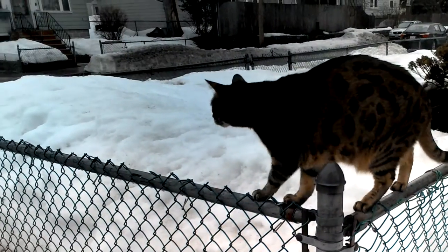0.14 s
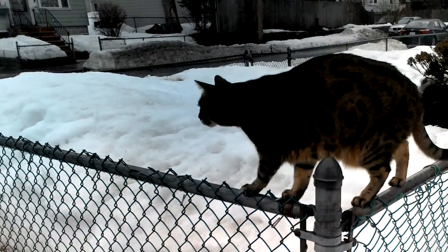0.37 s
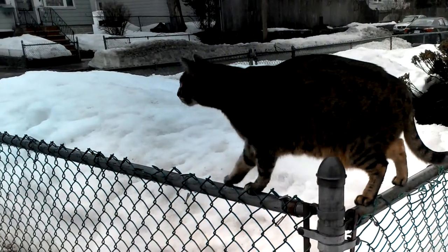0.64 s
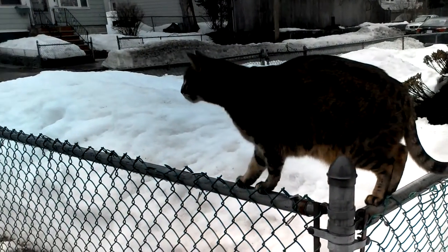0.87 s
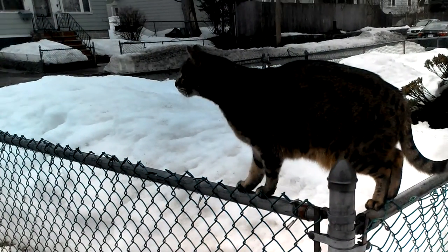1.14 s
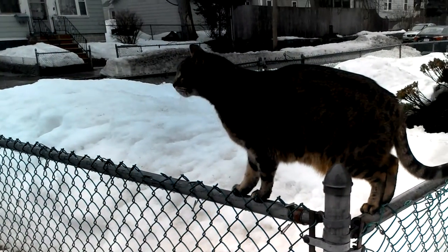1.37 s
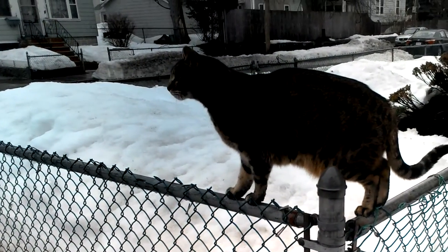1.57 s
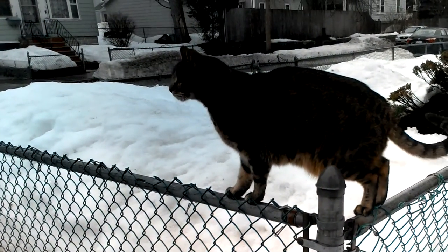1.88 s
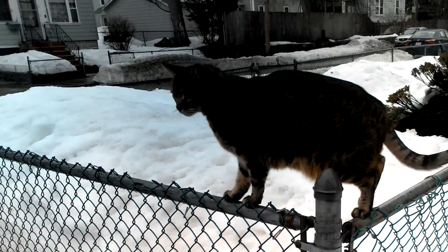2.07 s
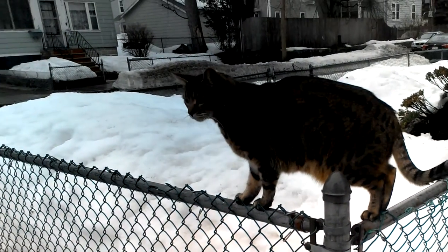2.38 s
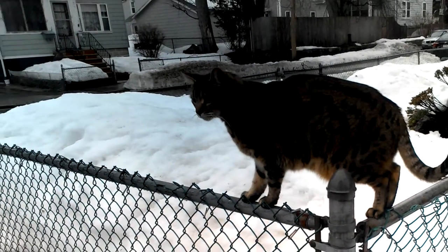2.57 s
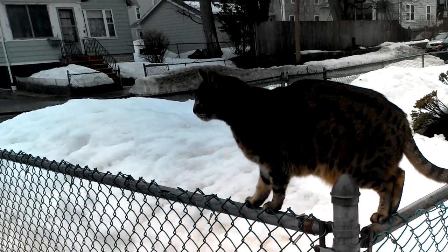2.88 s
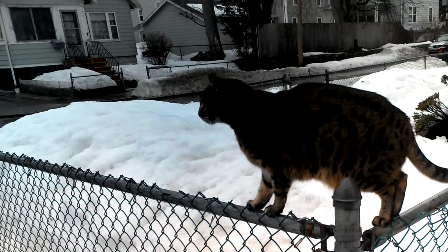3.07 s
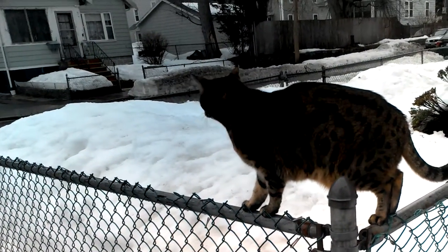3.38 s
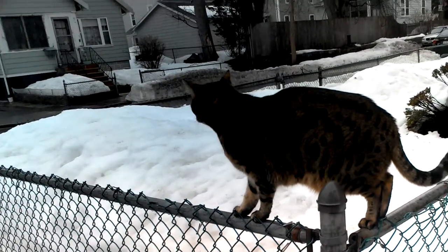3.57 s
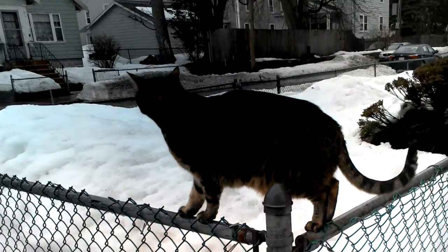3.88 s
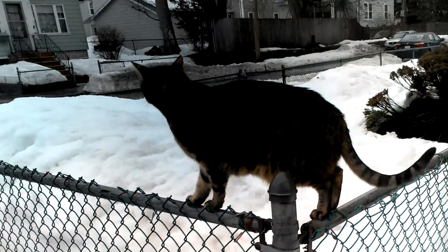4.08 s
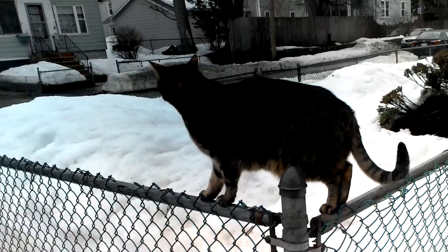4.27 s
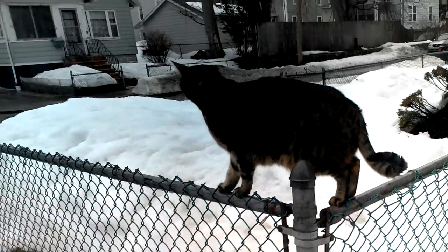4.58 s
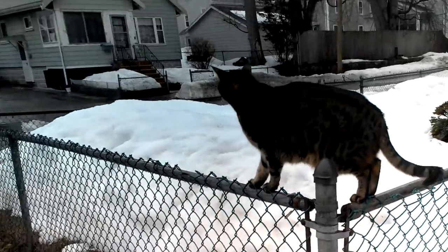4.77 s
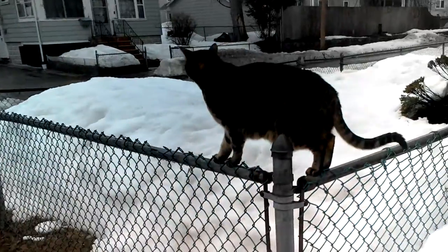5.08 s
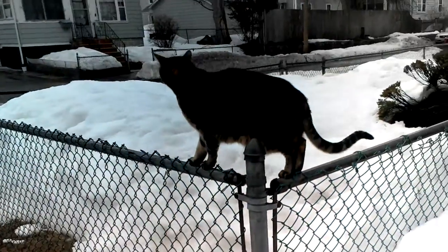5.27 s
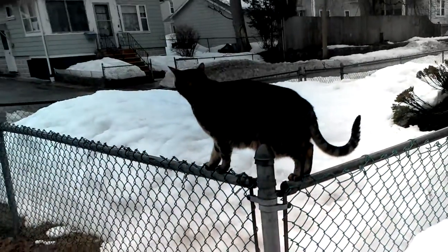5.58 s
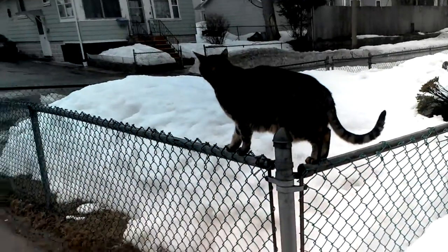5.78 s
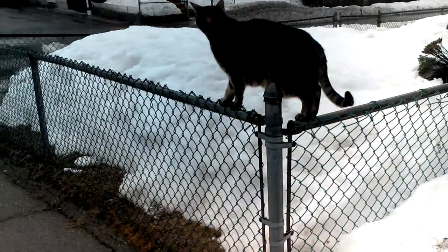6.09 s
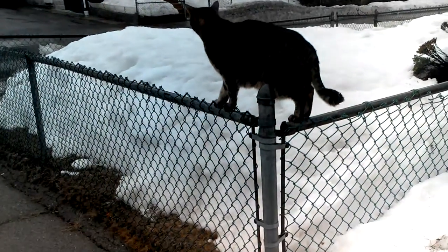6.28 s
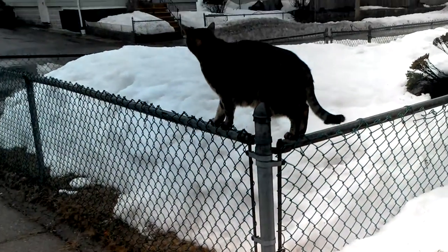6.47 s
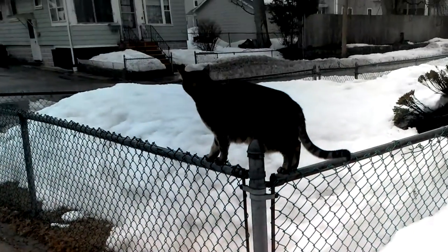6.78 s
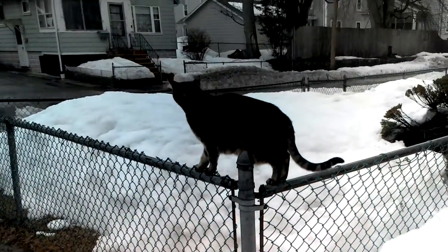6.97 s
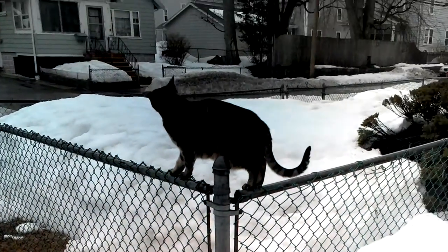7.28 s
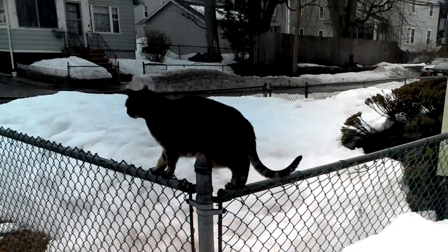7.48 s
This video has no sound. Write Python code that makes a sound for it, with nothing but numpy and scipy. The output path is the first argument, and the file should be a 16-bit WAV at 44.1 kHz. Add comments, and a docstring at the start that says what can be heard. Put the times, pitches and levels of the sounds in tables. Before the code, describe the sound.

Sharp, dense crackling taps close to a small microphone, opening with a rustling rush, over soft steady noise and faint rumble outdoors.

```python
"""Sharp crackling taps close to a small microphone, as of handling or stiff material crunching.
Each tap is a crack, a short ring and a low thump, made of fading sines and noise.
Fine crackle swells briefly around each strong tap, and a patter of light taps falls between them.
At first there is a rustling rush: dense noise and clicks, sent through resonances.
Soft steady background noise and a low rumble, both made of filtered noise, lie below."""
import sys
import numpy as np
from scipy import signal
from scipy.fft import rfft, irfft
from scipy.io import wavfile

SR = 44100
rng = np.random.default_rng(int(sys.argv[2]) if len(sys.argv) > 2 else 0)


def file_out(sig):
    """Save sig as 16-bit WAV at sys.argv[1]."""
    # one column per channel
    cols = np.atleast_2d(sig).T
    # limit, then scale
    lim = np.clip(cols, -1, 1)
    pcm = np.round(lim * 32767).astype(np.int16)
    wavfile.write(sys.argv[1], SR, pcm)


N = 336924

# strong taps: start_s [s], ring_pitch_hz [Hz], ring_db [dB],
# crack_pitch_hz [Hz], crack_db [dB], thump_db [dB]
STRONG_TAPS = [(0.04, 600, -7, 6800, -18, -41), (0.0621, 810, -13, 5740, -26, -36),
               (0.16, 900, -31, 7500, -8, -34), (0.171, 860, -18, 7050, -14, -34),
               (0.1853, 2140, -24, 7270, -6, -40), (0.2274, 480, -9.5, 3740, -12, -16),
               (0.2036, 900, -31, 9000, -7, -36), (0.282, 980, -40, 4500, -17, -39),
               (0.3862, 800, -11.5, 4640, -17, -26), (0.4901, 870, -37, 7240, -14.5, -43),
               (0.533, 910, -17.5, 3200, -22, -32), (0.614, 563, -15.5, 3500, -26, -32),
               (0.823, 500, -18, 6220, -14.5, -21), (0.8411, 720, -17, 5500, -16, -45),
               (1.167, 1240, -23.5, 4380, -19, -41), (1.1857, 1100, -12.5, 3270, -25, -18.5),
               (1.2342, 1190, -23.5, 4370, -25, -27), (1.3815, 457, -7, 3150, -11, -43),
               (1.3988, 470, -13, 3050, -24, -45), (1.4666, 640, -15.5, 3430, -52, -47),
               (1.5422, 480, -22, 3120, -52, -43), (1.6107, 566, -29, 3160, -42, -39),
               (1.7234, 1310, -29, 6020, -23, -43), (1.7382, 2000, -33, 5360, -22, -57),
               (1.821, 1110, -25, 8200, -13.5, -48), (1.8406, 1200, -21, 3240, -29, -50),
               (1.863, 1100, -21.0, 4600, -37, -42), (1.889, 1160, -23, 4760, -39, -50),
               (1.9096, 880, -26, 4550, -34, -34), (1.975, 1200, -27.5, 3770, -32, -48.5),
               (1.9864, 1140, -25, 6540, -30, -55), (1.9958, 1080, -36, 5140, -29, -55),
               (2.0055, 1190, -22.5, 5800, -20, -49), (2.014, 1090, -23, 4770, -23, -53),
               (2.0382, 640, -25, 6370, -21, -40), (2.098, 1340, -28.5, 7270, -41, -56),
               (2.1627, 1150, -29.5, 5200, -27, -55), (2.1783, 1290, -27, 5220, -31, -50),
               (2.183, 1210, -26.5, 3150, -52, -49.5), (2.3, 700, -22, 4240, -41, -46),
               (2.3306, 1100, -19, 5350, -38, -23), (2.3351, 810, -14, 5400, -15, -33.5),
               (2.3364, 1090, -24, 7700, -19, -26.5), (2.3435, 1290, -37, 4390, -35, -41),
               (2.405, 1170, -26, 3540, -39, -55), (2.4691, 570, -20.5, 3100, -46, -61),
               (2.478, 1120, -23.5, 3280, -41, -60), (2.5927, 1100, -30, 7900, -21.5, -57),
               (2.626, 1020, -23.5, 4260, -25, -58), (2.65, 1810, -15, 4000, -11.5, -21.5),
               (2.703, 1070, -19, 3780, -24, -56), (2.716, 1130, -27, 4380, -40, -54),
               (2.7202, 1690, -27.5, 3900, -32, -47), (2.7314, 480, -24, 6850, -26, -42),
               (2.738, 2170, -21, 6230, -18, -30), (2.8526, 1210, -26.5, 7100, -21.5, -38),
               (2.997, 1380, -28, 5670, -18.5, -53), (3.0494, 2820, -29, 5630, -25, -57),
               (3.064, 2780, -29.5, 6650, -24, -58), (3.1023, 1320, -28, 7340, -30, -54),
               (3.1078, 2220, -29, 7400, -23, -50), (3.1164, 915, -30, 7050, -17.5, -52),
               (3.14, 1060, -30, 7600, -21, -51), (3.172, 1350, -31, 4700, -24, -34),
               (3.2098, 1240, -34.5, 4220, -25, -53), (3.23, 685, -29, 3660, -37, -44),
               (3.3106, 990, -34, 8400, -31, -55.5), (3.3406, 1260, -33.5, 3680, -39, -57.5),
               (3.369, 1730, -33, 4380, -45, -57), (3.3928, 855, -31, 4220, -34, -52),
               (3.4466, 970, -14.5, 6820, -11, -37), (3.462, 2150, -26, 6260, -22, -32),
               (3.4708, 1000, -14, 4020, -9.5, -31), (3.5059, 1240, -19, 5800, -5, -48),
               (3.5079, 3080, -18.5, 5960, -4.5, -50), (3.5274, 1200, -51, 3940, -21, -49),
               (3.5468, 1100, -22, 5300, -13, -46.0), (3.554, 860, -34, 4260, -26, -46.5),
               (3.6098, 1130, -28, 3000, -23, -57), (3.6648, 1400, -31, 3400, -25, -70),
               (3.7834, 1100, -33, 5510, -31, -61.0), (3.7874, 1130, -37, 3970, -24.5, -57),
               (3.8128, 1310, -34.5, 6100, -28, -56), (3.851, 845, -34, 3930, -41, -60),
               (3.8925, 1100, -40, 7700, -33, -60), (3.9001, 1100, -32.5, 5800, -32, -55),
               (3.9285, 1290, -40, 7000, -33, -60), (3.959, 2300, -40, 6500, -42, -62),
               (3.9828, 2390, -22, 4020, -49, -64), (4.001, 1150, -28, 7260, -24, -45),
               (4.0283, 1230, -27, 3850, -17.5, -57), (4.0476, 450, -18.5, 6900, -17, -49),
               (4.064, 810, -28, 6310, -32, -57), (4.1101, 1100, -30.5, 5950, -24, -54),
               (4.1773, 585, -33, 3120, -33, -51), (4.244, 480, -27, 6920, -49, -51),
               (4.265, 800, -19, 3270, -20, -43), (4.283, 575, -12.5, 3180, -16, -32),
               (4.3202, 1100, -22.5, 7530, -19, -29), (4.3238, 920, -18, 3130, -25, -39),
               (4.442, 1070, -25.5, 8400, -25, -45), (4.5184, 1060, -27, 6190, -30.5, -40),
               (4.5217, 1060, -19, 6320, -9, -48), (4.537, 584, -16, 8100, -15, -42),
               (4.543, 1040, -22, 4530, -31, -39), (4.5997, 1030, -15, 4300, -21, -36),
               (4.6025, 593, -22, 4130, -33, -34), (4.6078, 706, -20, 4200, -22, -49),
               (4.6163, 1090, -25, 8300, -21, -46.5), (4.649, 1120, -28, 7600, -19, -56),
               (4.654, 990, -26, 5200, -18.5, -41), (4.739, 1070, -30, 5300, -23, -55),
               (4.783, 2220, -29.5, 4400, -42, -53), (4.823, 1100, -19.5, 5000, -25, -56),
               (4.8304, 686, -13, 9500, -12, -35.5), (4.84, 970, -26, 7900, -31, -31),
               (4.8477, 870, -20.5, 7780, -33, -51), (4.8495, 480, -28.0, 7720, -25, -27),
               (4.8891, 2030, -21, 3100, -40, -33), (4.8983, 710, -29, 8000, -26, -38),
               (4.9018, 980, -19.5, 7650, -28, -35), (4.9067, 860, -21, 7900, -32, -52),
               (4.951, 1040, -35, 3600, -29, -41), (4.9603, 935, -24, 3530, -22, -48),
               (5.0159, 1150, -24, 3500, -27.5, -51), (5.0202, 1040, -24, 3550, -29, -50),
               (5.058, 690, -11.5, 3900, -14, -24), (5.0636, 715, -21, 3780, -36, -47),
               (5.0704, 690, -19.5, 3320, -22, -36), (5.0755, 1120, -10, 3300, -8.5, -25),
               (5.0778, 620, -19, 7000, -16.5, -35), (5.0988, 660, -29, 8550, -33, -49),
               (5.1188, 670, -26, 3930, -27.5, -41), (5.1212, 680, -21, 3400, -36, -39),
               (5.1486, 1060, -20, 4370, -30, -38), (5.1656, 950, -24.5, 3410, -28, -49),
               (5.1723, 1840, -20, 3530, -42, -42), (5.1985, 890, -23.5, 6700, -36, -54),
               (5.2135, 980, -27, 3360, -26, -47), (5.2359, 1940, -23.5, 5100, -29, -47.0),
               (5.2405, 1100, -26.5, 4910, -26, -44), (5.2692, 1060, -19.5, 7200, -17, -39),
               (5.2771, 1070, -22, 7500, -27, -44), (5.3079, 2230, -28, 7160, -24, -55),
               (5.3881, 690, -25, 4070, -26, -40), (5.4102, 620, -21.5, 5000, -26, -39),
               (5.426, 570, -20.5, 4830, -30, -39), (5.444, 1370, -25, 6100, -32, -47),
               (5.45, 1660, -29, 3270, -38, -56.0), (5.464, 1670, -25, 7900, -19.5, -35),
               (5.478, 1720, -29, 3320, -30, -48.5), (5.503, 1110, -16.5, 2770, -11, -30),
               (5.508, 1730, -34, 3420, -31, -49), (5.513, 1060, -28, 3500, -33, -44),
               (5.535, 760, -19.5, 4070, -36, -34), (5.6135, 1040, -19.5, 7640, -26, -40),
               (5.6197, 740, -21, 2960, -19, -35), (5.6256, 1020, -27, 3030, -21, -47),
               (5.6513, 634, -17.5, 3340, -37, -29.5), (5.6565, 980, -20, 4060, -20, -32),
               (5.668, 1430, -24, 6530, -18.5, -53), (5.6717, 1730, -25, 6800, -29, -53),
               (5.693, 546, -25, 7900, -28, -33), (5.6965, 710, -25, 7070, -31, -43),
               (5.7334, 1130, -23, 4130, -45, -42), (5.738, 760, -28.5, 3530, -45, -51.0),
               (5.745, 1900, -33, 6420, -44, -50.5), (5.761, 1390, -37, 3190, -46, -57.0),
               (5.7753, 1910, -26, 4910, -33, -48.5), (5.7899, 800, -25.5, 4870, -31, -47),
               (5.7932, 730, -33, 7550, -26, -53), (5.847, 2520, -27, 6300, -33, -60),
               (5.8547, 825, -28.5, 3380, -27, -52), (5.8622, 2580, -43, 3420, -31, -56),
               (5.9058, 2600, -40, 3180, -38, -63.5), (5.9826, 1000, -31, 3000, -26, -52),
               (6.036, 1000, -27, 4650, -31, -51), (6.0706, 1770, -21.5, 6250, -18, -51),
               (6.0948, 650, -23.5, 6500, -18.5, -40), (6.1194, 980, -20.5, 7000, -18, -38),
               (6.124, 940, -30, 6100, -18, -51), (6.1365, 755, -22, 5900, -12.5, -41),
               (6.153, 1320, -20, 4000, -21, -47), (6.158, 1010, -16.5, 6200, -15, -36),
               (6.1661, 2170, -23.5, 7000, -20, -37), (6.1737, 1750, -19, 7700, -17, -50),
               (6.1934, 900, -31, 3770, -36, -44), (6.21, 1670, -35, 6140, -16, -53.5),
               (6.2332, 1390, -40, 6000, -26, -54.5), (6.32, 1020, -30, 7950, -29, -41),
               (6.3445, 890, -33, 4570, -21, -44), (6.3633, 1510, -36, 3900, -21, -46),
               (6.4378, 1430, -29, 3880, -29, -52), (6.5594, 630, -19.5, 3100, -33, -36),
               (6.5641, 1740, -25, 3180, -38, -43), (6.573, 1640, -22.5, 5900, -40, -34),
               (6.5765, 1750, -30, 5650, -31, -28), (6.5791, 840, -24, 7000, -28, -25),
               (6.627, 2200, -19, 6760, -24, -30), (6.645, 970, -19, 6260, -16.5, -46),
               (6.6537, 1210, -20, 3080, -32, -42), (6.6796, 513, -19, 3320, -41, -40.5),
               (6.6943, 530, -26, 3200, -43, -50), (6.6978, 1870, -27, 8090, -29, -49),
               (6.825, 970, -25, 5100, -21, -53), (6.8608, 980, -22.5, 3170, -22, -57),
               (6.8933, 1150, -20, 3970, -37, -52), (6.9084, 1710, -21, 3100, -38, -51),
               (6.937, 1670, -21, 3120, -38, -44), (6.9565, 1160, -25, 3610, -31, -52),
               (6.96, 940, -32, 3120, -21, -47), (6.98, 1050, -12, 5300, -20, -28),
               (7.006, 990, -18, 3230, -38, -36), (7.0082, 560, -22, 3230, -33.5, -36),
               (7.0109, 920, -24, 3100, -34, -44.5), (7.0164, 590, -39, 3870, -42, -50),
               (7.06, 1460, -26.5, 8290, -22, -49), (7.084, 1720, -17, 4770, -10.5, -49.0),
               (7.1397, 1750, -25.5, 3330, -32, -55), (7.182, 2640, -23, 3150, -19, -33),
               (7.205, 1500, -33, 7000, -38, -50), (7.2275, 1200, -35, 4000, -35, -52),
               (7.2396, 1290, -19.5, 6660, -9.5, -49), (7.263, 2634, -20, 6600, -22.5, -52),
               (7.283, 2030, -15.5, 4770, -18.5, -55), (7.339, 965, -36, 3540, -35, -59.0),
               (7.3788, 1330, -21, 5220, -44, -57.0), (7.386, 2650, -26, 3100, -32, -53),
               (7.3884, 2580, -18.5, 3060, -26, -39), (7.4137, 1530, -27, 3640, -32, -48.0),
               (7.421, 1920, -29, 3350, -30, -52.5), (7.446, 2200, -17, 3490, -38, -53),
               (7.476, 850, -21, 3520, -21, -32.5), (7.4826, 890, -20.5, 3200, -22, -31),
               (7.4975, 1930, -18, 3560, -16.5, -41), (7.5446, 895, -29, 4030, -39, -45.5),
               (7.5555, 1040, -19.5, 3400, -33, -47.0), (7.5621, 850, -10.5, 4700, -9, -35),
               (7.5697, 970, -23, 5750, -13, -55), (7.5926, 980, -14.5, 5500, -27, -41),
               (7.607, 1300, -24.5, 3240, -35, -47)]


def amp(db):
    """Turn decibels into a factor for the sound wave."""
    return 10 ** (np.asarray(db) / 20)


def rms_one(x):
    """Scale a sound to an average strength (RMS) of 1."""
    return x / np.sqrt(np.mean(x ** 2) + 1e-20)


def in_time(rows, silent_db=-90):
    """Draw lines between a table's levels, one value per sample; outside its times all is near silent."""
    s, *columns = np.transpose(rows)
    t = np.arange(N) / SR
    return [np.interp(t, s, column, silent_db, silent_db) for column in columns]


def drift(rate_per_s, step=16):
    """Smooth random wandering with a spread of 1, drawn at every 16th sample."""
    r = np.exp(-2 * np.pi * rate_per_s * step / SR)
    noise = rng.standard_normal(N // step + 3000)
    slow = signal.lfilter([1], [1, -2 * r, r * r], noise)[2998:]   # skip the filter's start
    return np.interp(np.arange(N) / step, np.arange(len(slow)), rms_one(slow))


def resonance(x, hz, width_hz):
    """Let one band of pitches ring, as a springy body does; the gain at its peak is 1."""
    r = np.exp(-np.pi * width_hz / SR)
    feed = np.array([1, 0, -1]) * (1 - r * r) / 2
    return signal.lfilter(feed, [1, -2 * r * np.cos(2 * np.pi * hz / SR), r * r], x)


def filtered(x, order, hz, kind):
    """Keep only the pitches above a limit ("high"), below it ("low") or between two ("band")."""
    return signal.sosfilt(signal.butter(order, hz, kind, fs=SR, output="sos"), x)


def background():
    """Soft steady noise of many pitches, with low bands of noise that swell and fade as a rumble."""
    # colour of the steady noise: pitch_hz [Hz], density_db [dB per Hz, relative]
    noise_colour = [(80, -33), (130, 4.5), (300, 7), (900, 4), (2500, 1.5), (6000, -5.5), (16000, -6)]
    # low rumble: start_s [s], level_db [dB]
    rumble_levels = [(0.05, -48), (0.34, -83), (1.2, -58), (1.7, -68.5), (3.7, -74), (5.0, -68.5),
                     (5.26, -70), (6.4, -69), (7.64, -62)]
    steady_db = -56
    hz, db = np.transpose(noise_colour)
    f = np.arange(N // 2 + 1) * SR / N + 1   # 1 Hz is added to avoid log(0)
    colour = amp(np.interp(np.log(f), np.log(hz), db))
    steady = irfft(rfft(rng.standard_normal(N)) * colour, N)
    steady_gain = amp(steady_db + drift(1) + 0.96 * drift(20))

    white = rng.standard_normal(N)
    rumble = resonance(resonance(white, 57, 61), 150, 110)
    rumble += amp(-4.0) * resonance(white, 38, 91)
    rumble += amp(-3.0) * resonance(white, 70, 8.9)
    rumble_gain = amp(in_time(rumble_levels)[0])
    return steady_gain * rms_one(steady) + rumble_gain * rms_one(rumble)


def rush():
    """A rustling rush: dense noise with sharp clicks excites broad low and high resonances."""
    # strength of the rush: start_s [s], hiss_db [dB]
    rush_levels = [(0.0, -41), (0.2, -33), (0.43, -41), (0.49, -32.5), (0.56, -34.5), (0.66, -33),
                   (0.74, -39.5), (0.97, -43), (1.06, -37.5), (1.2, -46.5), (1.4, -51.5), (1.75, -80)]
    # low resonances: pitch_hz [Hz], width_hz [Hz], level_db [dB], change_db_per_s [dB per s]
    body_bands = [(211, 100, 3.5, 1), (545, 460, 4.5, -1.5), (800, 173, 5.5, 2.5), (1100, 250, -4.5, 6.5),
                  (1560, 220, -32.5, 18)]
    # high resonances: pitch_hz [Hz], width_hz [Hz], level_db [dB], change_db_per_s [dB per s]
    hiss_bands = [(2200, 1000, -7, -0.5), (3300, 230, -3.5, -2.5), (3940, 410, -2, -8.5),
                  (4450, 470, -5.5, 2.5), (5240, 1060, -3, -1.5), (6800, 2300, -4, -0.5),
                  (8120, 1660, -3.5, -4)]
    body_start_db, body_follows = -33, 0.3   # the body swings less than the hiss
    body_ends_s, body_fade_db_per_s = 0.9, -15.5
    finest_start_db, finest_db_per_s = 3.5, -8.5   # over the hiss; the rush grows duller
    patchy_db, patchy_per_s = 1.5, 4   # each high resonance comes and goes
    clicks_per_s, click_db = 350, 18

    hiss_db, = in_time(rush_levels)
    t = np.arange(N) / SR
    fade_db = body_fade_db_per_s * np.maximum(t - body_ends_s, 0)
    body_db = body_start_db + body_follows * (hiss_db - rush_levels[0][1]) + fade_db
    finest_db = hiss_db + finest_start_db + finest_db_per_s * t

    rustle = rng.standard_normal(N) * amp(2.5 * drift(400) + 1.5 * drift(40))
    clicks = rng.random(N) < clicks_per_s / SR
    rustle += amp(click_db + 1.33 * rng.standard_normal(N)) * clicks

    change_s = np.minimum(t, 2)   # the colour stops changing after 2 s
    body, hiss = np.zeros(N), np.zeros(N)
    # neighbouring bands have opposite signs
    for k, (hz, width_hz, db, db_per_s) in enumerate(body_bands):
        gain = (-1) ** k * amp(db + db_per_s * change_s)
        body += gain * resonance(rustle, hz, width_hz) / np.sqrt(width_hz)
    for k, (hz, width_hz, db, db_per_s) in enumerate(hiss_bands):
        gain = (-1) ** k * amp(db + db_per_s * change_s + patchy_db * drift(patchy_per_s))
        hiss += gain * resonance(rustle, hz, width_hz)
    finest = rms_one(filtered(rustle, 2, [8300, 10500], "band"))
    finest = finest + amp(2) * rms_one(filtered(rustle, 4, 11500, "high"))
    return amp(body_db) * rms_one(body) + amp(hiss_db) * rms_one(hiss) + amp(finest_db) * finest


def taps(s, pitch_hz, ring_db, crack_hz, crack_db, thump_db, size=1024, count=3, damped=1):
    """Taps made of a crack of noise, fading ring tones and a thump, which start with a fall in pressure."""
    # tones of the ring: multiple [times the ring pitch], level_db [dB]
    ring_tones = [(1.0, -7), (1.5, -14), (2.0, -19), (3.1, -33.5)]
    # times to fade by 60 dB, ahead of the factor "damped"
    crack_t60_s, ping_t60_s, ring_t60_s, thump_t60_s = .0015, .005, .012, .012
    rise_s = 0.000092
    short_below_hz = 1100   # rings lower than this fade sooner
    snap_s, snap_db = .00005, -2   # first sharp fall in pressure: time to its peak, height against the ring
    thump_centre_hz, thump_spread = 360, .3   # the spread is a share of the pitch, from lowest to highest
    earliest_s, latest_s, part_db = -.0008, .002, -13   # each tap comes in parts

    t = np.arange(size) / SR
    luck = rng.standard_normal((len(s), size + 2 * len(ring_tones)))
    parts = rng.random((len(s), 2 * count))

    def dying(t60_s):
        return amp(-60 * t / (t60_s * damped))

    def col(values):   # one row per tap
        return np.asarray(values)[:, None]

    # crack: a burst of noise and a very short ping
    grit = np.diff(luck[:, :size + 1]) * (1 - np.exp(-t / rise_s)) * dying(crack_t60_s)
    grit = grit / np.abs(grit).max(axis=1, keepdims=True)
    ping = np.sin(2 * np.pi * col(crack_hz) * t) * dying(ping_t60_s)
    shape = amp(col(crack_db)) * (grit - amp(-9.5) * ping)

    length = np.minimum(col(pitch_hz) / short_below_hz, 1)
    for k, (multiple, tone_db) in enumerate(ring_tones):
        detune = 1 + 0.35 * luck[:, -1 - k]   # no two taps are tuned alike
        hz = col(pitch_hz * (1 + (multiple - 1) * detune))
        gain = amp(col(ring_db + tone_db + 2 * luck[:, size + k]))
        shape -= gain * dying(ring_t60_s * length / multiple) * np.sin(2 * np.pi * hz * t)
    shape -= amp(col(ring_db + snap_db)) * t / snap_s * np.exp(1 - t / snap_s)
    shape = filtered(shape, 2, [300, 14500], "band")   # no bass and a soft top

    thump_hz = thump_centre_hz * col(1 + thump_spread * (parts[:, 0] - .5))
    shape -= amp(col(thump_db)) * dying(thump_t60_s) * np.sin(2 * np.pi * thump_hz * t)

    # weaker parts around the main one colour each tap in its own way; turning phases delays a part
    lead = 128   # samples of room for the early parts
    turn = -2j * np.pi * np.arange(size // 2 + 1) / size
    copies = np.exp(turn * lead)
    for k in range(count):
        lag = lead + np.round(SR * (earliest_s + (latest_s - earliest_s) * parts[:, k]))
        gain = amp(col(part_db + 10 * (parts[:, count + k] - .5)))
        copies = copies + gain * np.exp(turn * col(lag))
    shape = irfft(rfft(shape) * copies, size)

    out = np.zeros(N + size + lead)
    for start, one in zip(np.round(np.asarray(s) * SR).astype(int), shape):
        out[start:start + size] += one
    return out[lead:N + lead]


def light_taps():
    """Light taps come at random, in clumps; many ring at the pitch of the next strong tap."""
    # patter of light taps: start_s [s], ring_db [dB], crack_db [dB]
    patter = [(1.1, -38, -40), (1.41, -35.5, -66), (1.63, -47, -48), (1.9, -40, -40), (2.28, -44, -67),
              (2.45, -41.5, -46), (2.85, -44.5, -54), (3.54, -45.5, -38), (3.9, -61, -46.5),
              (4.4, -42.5, -48.5), (4.89, -44.5, -52), (5.15, -40.5, -45), (5.62, -38, -52),
              (6.04, -41, -42), (6.18, -38.5, -32.5), (6.4, -43, -43), (6.9, -35.5, -48), (7.64, -32, -56)]
    taps_per_s = 180   # typical rate, around which the clumps vary
    lowest_crack_hz, highest_crack_hz = 3350, 8500
    thump_under_ring_db, thump_db_per_s = -21.5, 2   # the thump grows against the ring as time goes on

    ring_db, crack_db = in_time(patter)
    at = np.flatnonzero(rng.random(N) < taps_per_s * amp(2 * drift(15)) / SR)
    luck = rng.random((len(at), 6))
    size_db = -5.5 * np.log(np.maximum(luck[:, 0], .12))   # few of them are loud

    s, strong_hz = np.transpose(STRONG_TAPS)[:2]
    nearby_hz = strong_hz[np.minimum(np.searchsorted(s, at / SR), len(s) - 1)]
    other_hz = 500 * 5.17 ** luck[:, 2]
    pitch_hz = np.where(luck[:, 1] < .6, nearby_hz, other_hz)
    crack_hz = lowest_crack_hz + (highest_crack_hz - lowest_crack_hz) * luck[:, 5]

    one_crack_db = crack_db[at] + size_db + 8 * (luck[:, 3] - .5)
    thump_db = ring_db[at] + thump_under_ring_db + thump_db_per_s * at / SR
    thump_db = thump_db + size_db + 8 * (luck[:, 4] - .5)
    # light taps are drier: they fade sooner and come in fewer parts
    return taps(at / SR, pitch_hz, ring_db[at] + size_db, crack_hz, one_crack_db, thump_db,
                size=512, count=1, damped=0.36)


def strong_taps(count=12):
    """Strong taps, each amid fine crackle: random clicks through bands near the pitches of the tap."""
    fade_t60_s, lead_in_t60_s = 0.26, 0.045   # crackle swells briefly before a tap and dies away after it
    s, pitch_hz, ring_db, crack_hz, crack_db, thump_db = np.transpose(STRONG_TAPS)
    hits = taps(s, pitch_hz, ring_db, crack_hz, crack_db, thump_db)

    # the strength of the crackle follows the hits, smoothed forwards and backwards in time
    after, before = amp(-60 / (fade_t60_s * SR)), amp(-60 / (lead_in_t60_s * SR))
    strength = signal.lfilter([1 - after], [1, -after], np.abs(hits))
    lead_in = signal.lfilter([1 - before], [1, -before], np.abs(hits)[::-1])[::-1]
    strength += amp(-7.5) * lead_in

    click_db = 6 * np.minimum(rng.exponential(1, N), 3)
    clicks = -amp(click_db) * (rng.random(N) < 900 / SR)   # about 900 per second
    latest = np.maximum(np.searchsorted(s * SR, np.arange(N)) - 1, 0)   # latest strong tap

    def ringing(tap_hz, bands_hz, width_hz):
        """Send the clicks through the band nearest in pitch to the latest strong tap."""
        nearest = np.argmin(np.abs(np.log(tap_hz[:, None] / bands_hz)), axis=1)[latest]
        return sum(resonance(clicks * (nearest == k) + 1e-18, hz, width_hz)
                   for k, hz in enumerate(bands_hz))

    ring = ringing(pitch_hz, np.geomspace(480, 2900, count), 150)
    fizz = ringing(crack_hz, np.geomspace(3000, 8500, count), 300)
    broad = resonance(resonance(clicks, 400, 980), 610, 4300)
    broad = broad + amp(-13.0) * resonance(clicks, 5500, 4900)
    crackle = amp(-5.5) * rms_one(ring) + amp(-10) * rms_one(fizz) + amp(-0.5) * rms_one(broad)
    return hits + strength * crackle


def close_echoes(x):
    """Dense random echoes, fading fast, add a short tail and a fine ripple to the colour."""
    echo_t60_s, echo_db = .04, -15
    first = 40   # samples ahead of the first echo
    t = np.arange(first, 3000) / SR
    echoes = rng.standard_normal(len(t)) * amp(-60 * t / echo_t60_s)
    echoes = np.r_[np.zeros(first), echoes / np.linalg.norm(echoes)]
    return x + amp(echo_db) * signal.fftconvolve(x, echoes)[:N]


def wandering_colour(x, count=40):
    """Narrow bands gain and lose slowly, each by its own random drift."""
    wander_db, wander_per_s = 2.5, 4   # how far and how fast the colour wanders
    wander = np.zeros(N)
    for hz in np.geomspace(450, 11000, count):
        gain = amp(wander_db * np.clip(drift(wander_per_s), -2, 1.2))
        wander += (gain - 1) * resonance(x, hz, hz / 16)
    return x + wander


def scene():
    """Taps and rush share close echoes and a wandering colour; the background is added to them."""
    near = wandering_colour(close_echoes(strong_taps() + light_taps() + rush()))
    near = filtered(near, 4, 170, "high")   # the close sounds have no deep bass
    return (near + background())[None]


def record(dry):
    """A resonance lifts the treble, which falls steeply above it; faint hiss joins and the top is cut."""
    treble_hz, treble_width_hz, treble_db = 7300, 1900, 3
    air_db = -28.5   # what still passes above the steep fall
    cutoff_hz = 16300
    x = dry + amp(treble_db) * resonance(dry, treble_hz, treble_width_hz)
    x = amp(air_db) * x + filtered(x, 4, 8800, "low")
    x = x + amp(-67) * rng.standard_normal(x.shape)   # hiss
    x = 1.1 * np.tanh(x / 1.1)   # round the highest peaks
    return signal.sosfilt(signal.cheby2(12, 60, cutoff_hz, fs=SR, output="sos"), x)


dry = scene()
out = record(dry)
file_out(out)
```